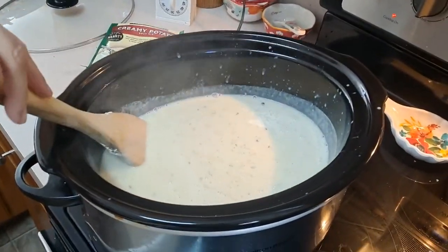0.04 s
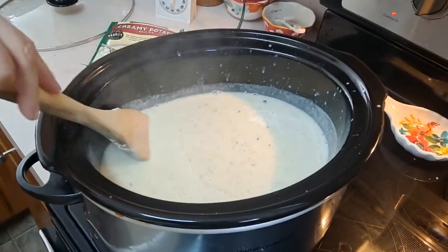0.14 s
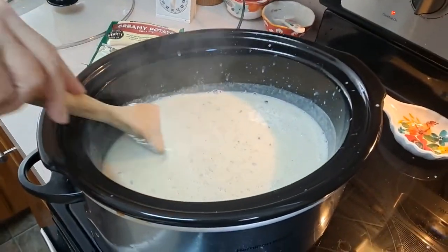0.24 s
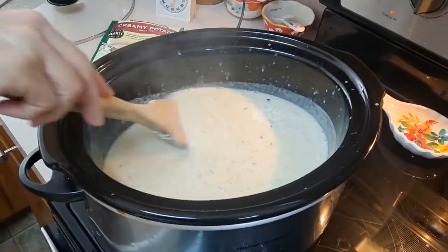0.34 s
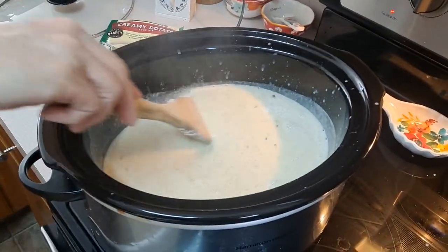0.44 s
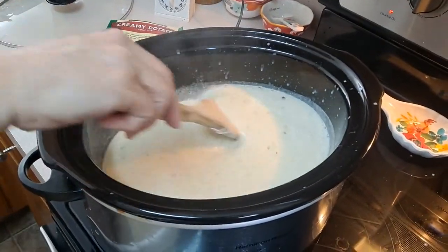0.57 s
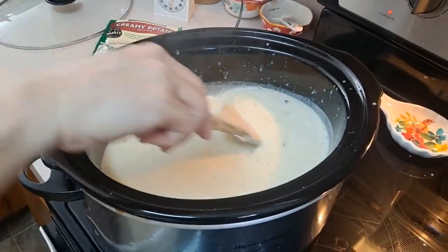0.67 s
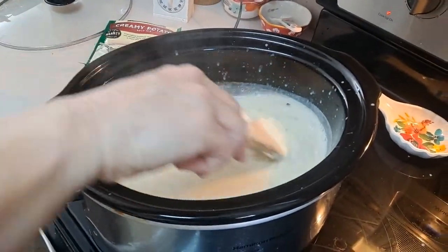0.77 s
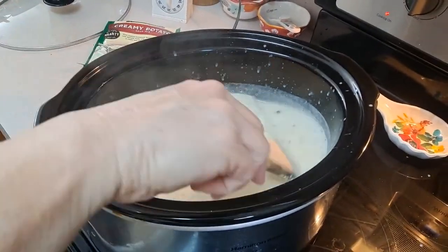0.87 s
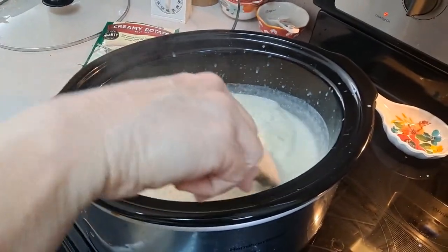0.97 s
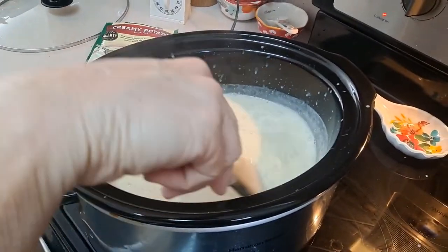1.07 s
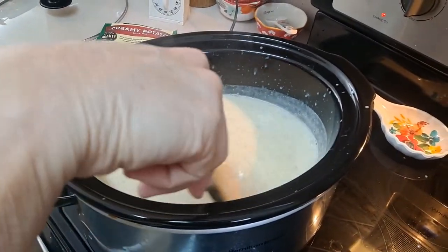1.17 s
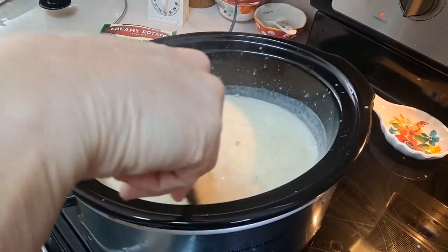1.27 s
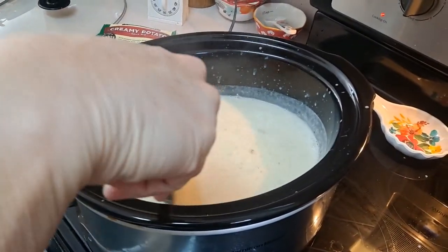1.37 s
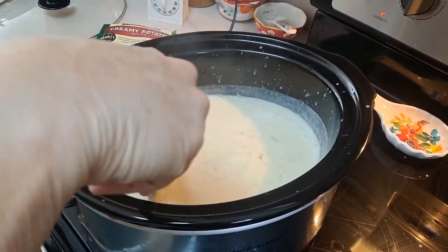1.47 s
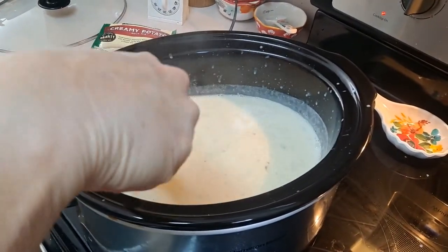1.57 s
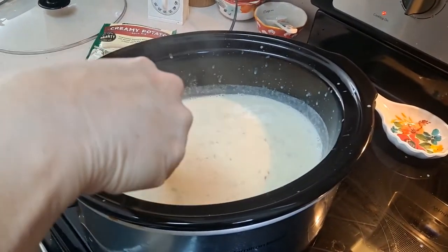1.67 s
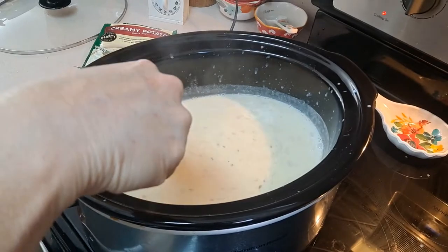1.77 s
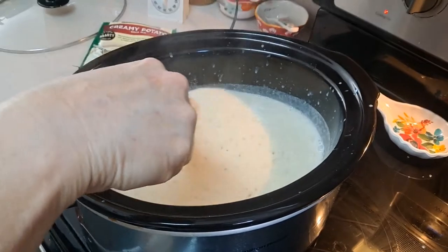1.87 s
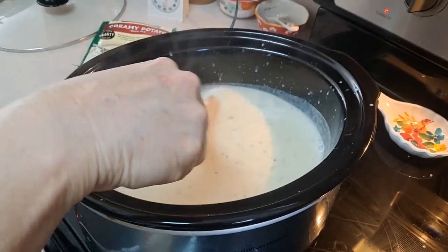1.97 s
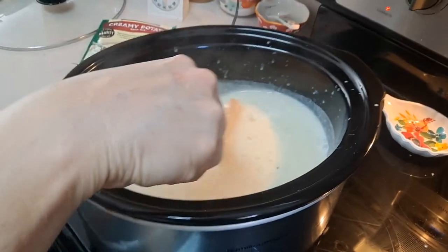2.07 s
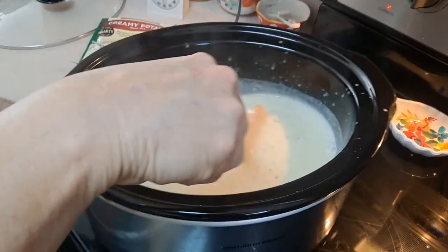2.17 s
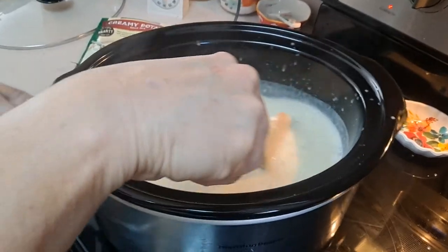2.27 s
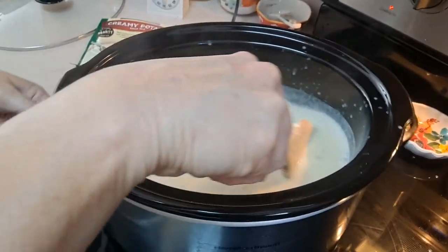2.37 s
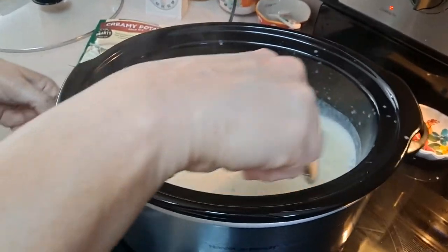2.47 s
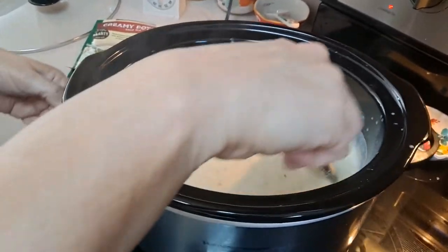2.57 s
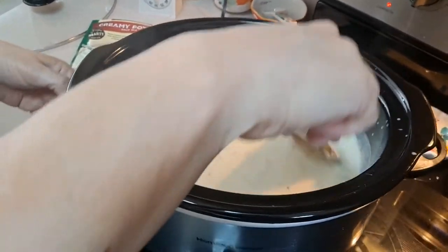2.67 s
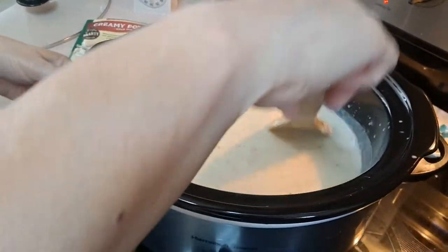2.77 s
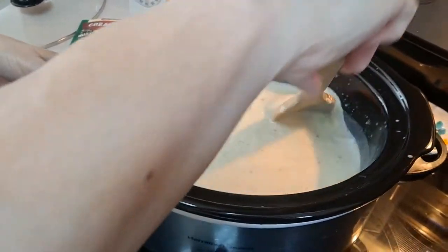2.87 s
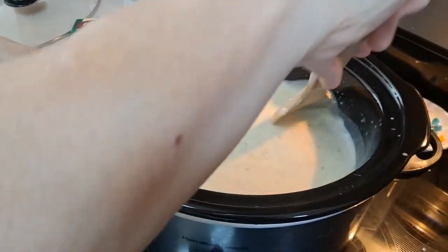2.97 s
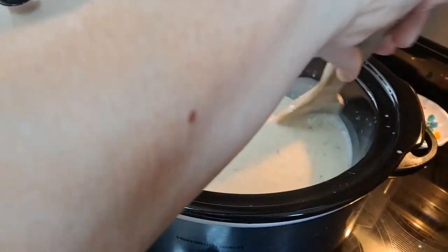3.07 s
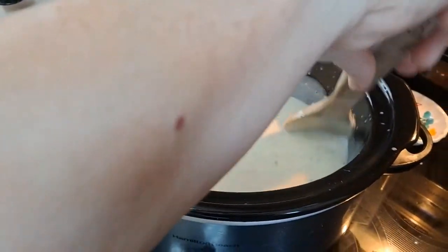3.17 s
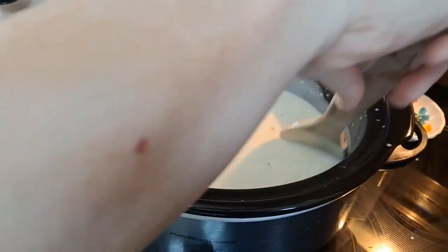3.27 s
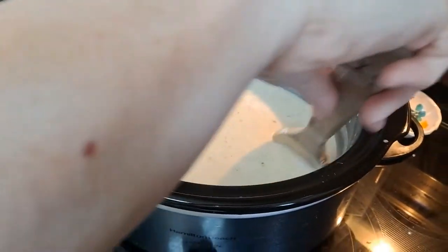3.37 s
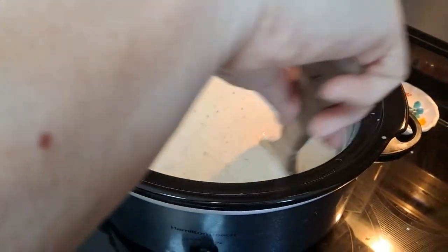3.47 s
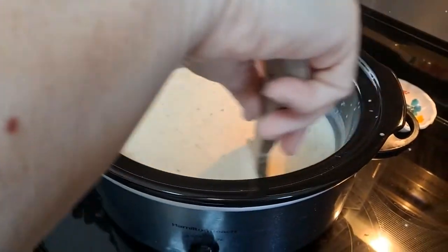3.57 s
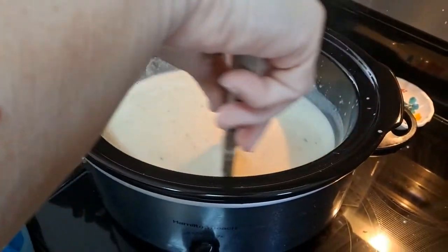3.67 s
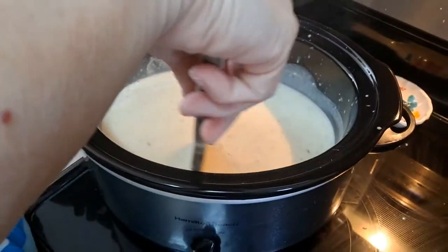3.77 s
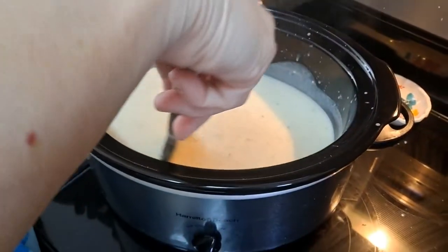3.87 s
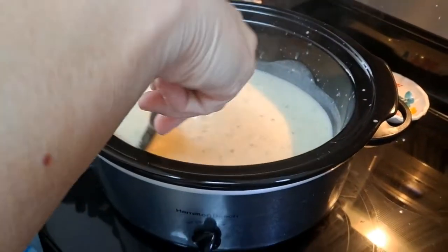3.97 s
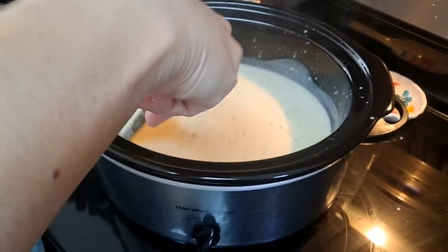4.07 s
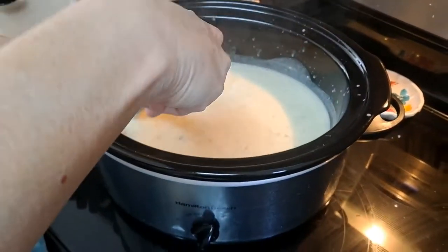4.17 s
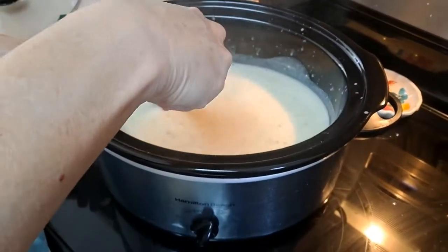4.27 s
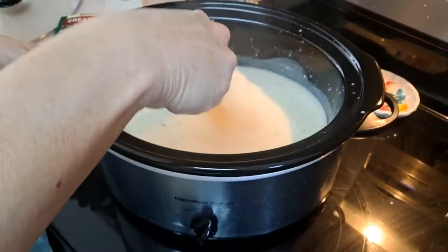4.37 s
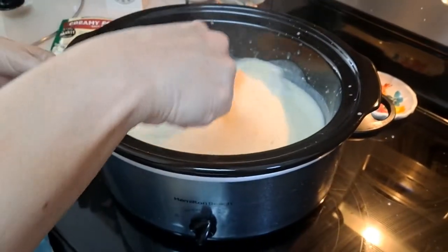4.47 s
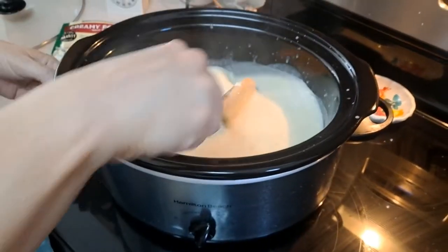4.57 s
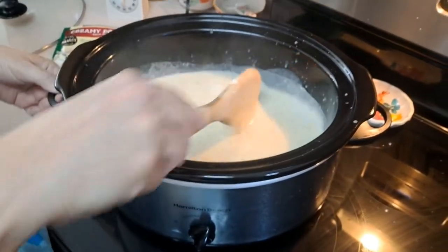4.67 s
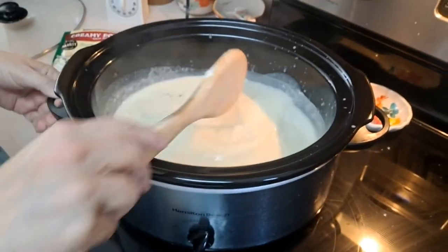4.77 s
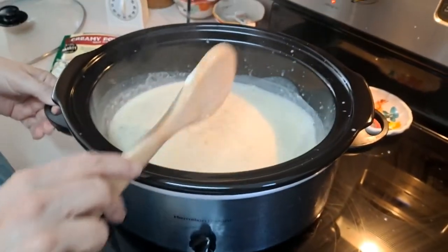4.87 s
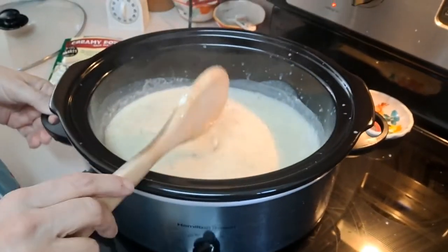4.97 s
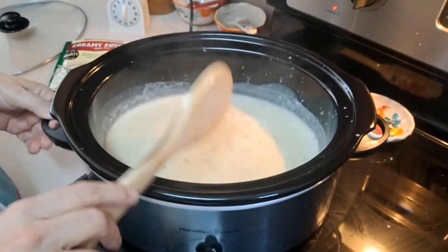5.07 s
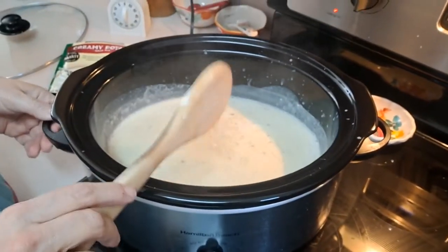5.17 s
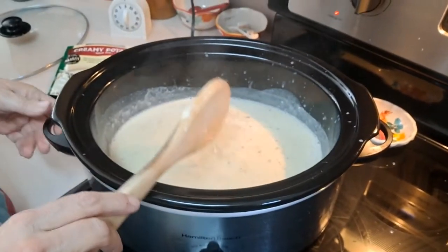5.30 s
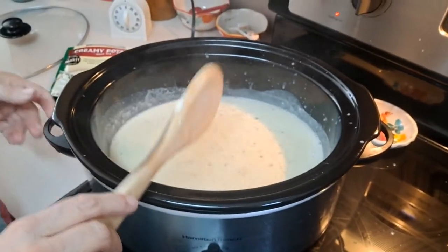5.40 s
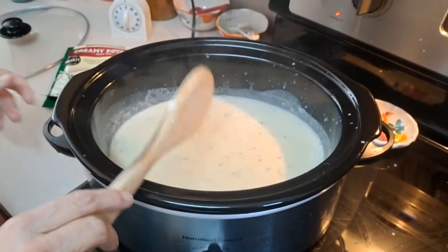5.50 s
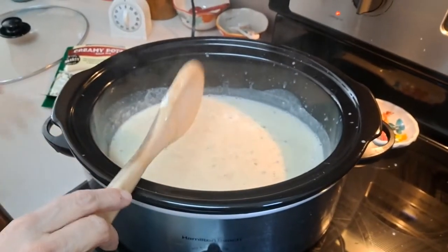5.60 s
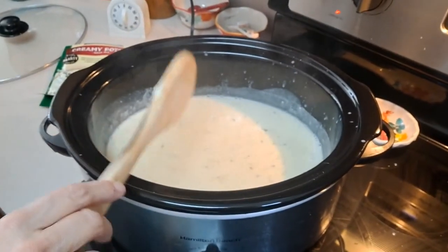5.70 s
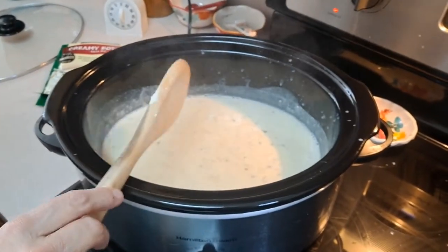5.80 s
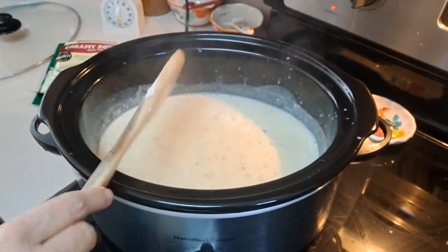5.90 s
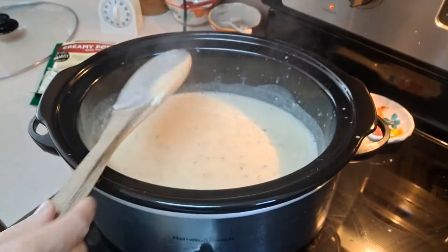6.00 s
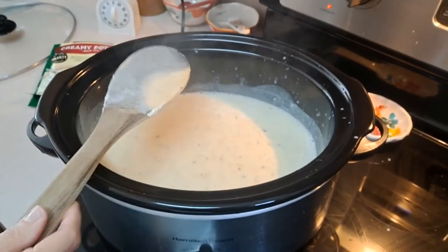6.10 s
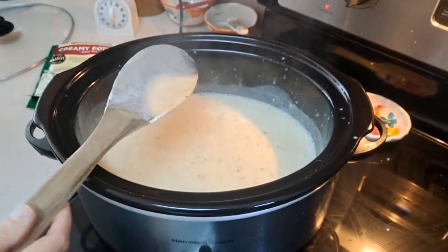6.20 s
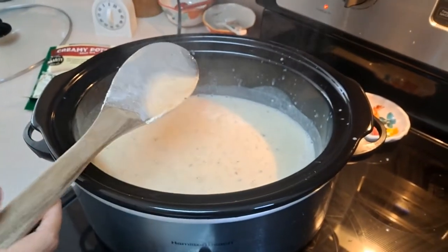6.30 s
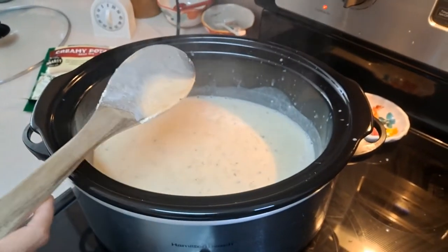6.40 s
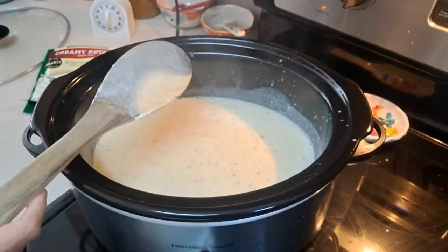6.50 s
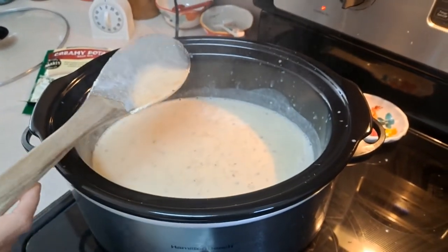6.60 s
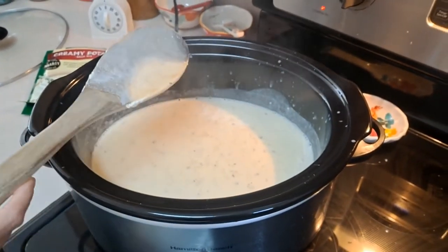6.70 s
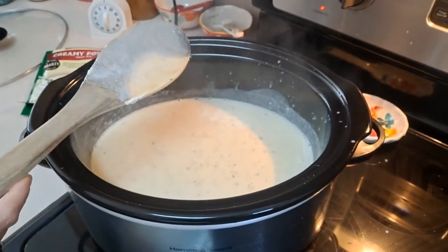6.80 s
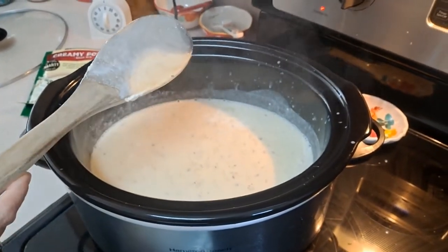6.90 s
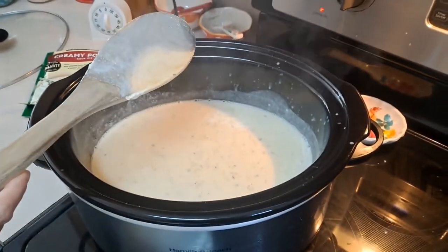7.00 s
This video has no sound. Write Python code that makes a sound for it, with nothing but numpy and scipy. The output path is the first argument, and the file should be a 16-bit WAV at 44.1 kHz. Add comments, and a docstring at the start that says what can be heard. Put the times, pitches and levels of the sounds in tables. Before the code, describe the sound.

In a small kitchen, a wooden spoon drags and knocks through a filled ceramic crock, with low thumps and short damped rings. The heavy cooker then rubs quietly across a gritty counter, with light clatter and a soft soup swish. Finally six crisp wooden raps strike the rim at a steady pace. A faint motor hum lies beneath; the microphone is close, in stereo.

```python
"""A wooden spoon stirs thick soup in the ceramic crock of a slow cooker: trains of stick-slip blows ring crock and blade.
Six raps of the handle on the rim follow, each a crack with a rattle and the damped modes of the spoon.
Between them a push slides the cooker over the counter as rubbing noise, grit and housing resonances; light bumps
clatter and clink, and soup swishes as soft bands of noise. Motor lines hum over low air noise.
A small kitchen answers the strokes, raps, bumps and grit with quick reflections and a fading tail."""
import sys
import numpy as np
from scipy import signal
from scipy.fft import rfft, irfft
from scipy.io import wavfile
from scipy.ndimage import uniform_filter1d, map_coordinates

SR = 44100
rng = np.random.default_rng(int(sys.argv[2]) if len(sys.argv) > 2 else 0)


def waveform_to_disk(signal):
    """Save audio, clipped to [-1, 1], as 16-bit WAV at the path in sys.argv[1]."""
    frames = np.transpose(np.atleast_2d(signal))
    scaled = np.clip(frames, -1, 1) * 32767
    samples = np.round(scaled).astype(np.int16)
    wavfile.write(sys.argv[1], SR, samples)


N = 310905
TIME = np.arange(N) / SR
SHORT = TIME[:SR // 2]  # time axis of one short event [s]

# Motor lines: (frequency [Hz], level [dB])
MOTOR_LINES = [(59.2, -62), (80.7, -65), (118.4, -55), (209.9, -67), (296.1, -55.5), (355.3, -74),
               (414.5, -70), (640.6, -85)]
# Colour of the kitchen air: (frequency [Hz], relative level [dB])
AIR_COLOUR = [(12, -46.5), (22, -6), (32, -1.5), (113, -6.5), (137, -6.5), (162, -8), (209, 2),
              (247, -10.5), (300, -10.5), (345, -16.5), (419, -14), (586, -24.5), (1350, -37),
              (5950, -47.5), (9300, -41.5), (15800, -53)]
# Stereo balance of the air: (frequency [Hz], left minus right [dB])
AIR_BALANCE = [(60, -13.5), (110, -8), (200, -2), (700, -4), (1500, 0)]
AIR_DB = -51

# Fade of the kitchen: (frequency [Hz], t60 [s])
ROOM_T60 = [(80, 0.33), (300, 0.43), (1000, 0.36), (2000, 0.33), (6000, 0.3), (14000, 0.2)]
# Likeness of the two channels in diffuse sound: (frequency [Hz], correlation [0-1])
LIKENESS = [(100, 1), (300, 0.76), (700, 0.3), (1300, 0.0096)]
RIGHT_LAG_MS = 0.14

# Hand pushing the cooker over the counter: (time [s], attack [s], length [s], level [dB])
PUSHES = [(1.982, 0.12, 0.26, -45), (2.207, 0.24, 0.5, -45)]
# Colour of the feet rubbing the counter: (frequency [Hz], relative level [dB])
SLIDE_COLOUR = [(200, 13), (450, -2), (650, -6.5), (820, 2), (1050, -11), (1200, 0.5), (1350, -8),
                (1550, -3), (2400, -4), (3200, -8.5), (5000, -15), (9000, -19), (10500, -31), (15000, -26)]
# Resonances of the cooker housing: (frequency [Hz], width [Hz], level against the rubbing [dB])
HOUSING = [(810, 70, -27), (1170, 38, -22.5), (1370, 83, -22), (1556, 100, -15), (1920, 50, -24),
           (2130, 66, -19), (2410, 78, -22), (2670, 60, -20.5), (3200, 150, -23)]
PUSH_RELEASE_S = 0.099  # coasting to rest
RUB_DB, FRICTION_DB, CATCH_DB = -1, 0.5, 0.5  # plain rubbing; its fast unevenness; slower catching of the feet
HOUSING_DRIFT, HOUSING_FLICKER_DB = 0.016, 6.5  # the load shifts their pitch [share] and strength
GRAINS_PER_S, GRAIN_SPREAD_DB, GRAIN_DB = 260, 7.5, -14  # specks of grit catching under the feet

# Soup parting around the spoon: (time of peak [s], level [dB], half length [s], centre [Hz], width [octaves])
SWISHES = [(3.277, -70.5, 0.17, 1160, 0.25), (3.756, -74, .25, 630, 0.31), (4.944, -63, 0.091, 1620, 0.62)]

# Small bumps around the cooker:
# (time [s], energy [dB], centre [Hz], width [octaves], t60 [s], low thud [dB], ring [dB])
BUMPS = [(2.8983, -15, 1340, 0.39, 0.005, -17, 13), (3.008, -17, 1620, 0.69, 0.047, 5.5, -11),
         (3.026, -24.5, 1100, 1, 0.092, 10, -29), (4.195, -17.5, 506, 0.27, 0.06, -9, -33)]
# Modes of what is bumped, perhaps a dish: (frequency [Hz], relative level [dB], t60 [s])
DISH = [(610, -2.5, 0.07), (759, -11, 0.1), (1010, 1, 0.02), (1170, -3.5, 0.085), (1270, -2, .014),
        (1790, -13, 0.013), (1990, -7, .012), (2550, -12, .008), (2900, -12, .012)]

# Spoon handle rapped on the rim: (time [s], energy [dB], crack [dB], place along the handle [-1 to 1])
RAPS = [(4.9508, 9.5, -7, -0.5), (5.1266, 10, -7.5, -0.61), (5.2892, 10, -4, -0.53), (5.4583, 9, -6, 0.065),
        (5.6451, 8.5, -6, -0.16), (5.8287, 9, -9.5, 0.68)]
# Modes of the spoon against the rim:
# (frequency [Hz], relative level [dB], t60 [s], gain per unit of place [dB])
SPOON = [(221.4, -20, 0.075, 10.5), (272, -7.5, 0.038, -3.5), (404, -7, 0.047, -2.5),
         (543, -7.5, 0.026, -1), (636, -10.5, 0.071, -0.5), (696, -15, 0.12, 2), (1268, -6, 0.026, 4),
         (1484, -13, 0.042, -0.5), (1555, -8.5, 0.07, -4), (1755, -1, 0.05, 0), (1853, -7.5, 0.06, -1),
         (1993, -1.5, 0.012, -3), (2290, -13, 0.029, -6.5), (3073, -10.5, 0.013, -1.5),
         (3966, -15, 0.029, -4.5), (5860, -15.5, .012, -7)]
# Colour of the crack at the contact: (frequency [Hz], relative level [dB])
CRACK = [(15, -29.5), (50, -21), (130, 2), (600, 9), (1000, 2), (1800, -3.5), (2600, 2.5), (3200, -4),
         (4000, -4.5), (4900, -5), (5800, -4), (6900, -16), (7700, -11), (9500, -15.5), (11000, -23.5),
         (15000, -32)]
REBOUND_SHARE, RATTLE_DB = 0.5, -12.5  # chatter against the blow; rattle against the crack

# Spoon dragging on the crock under the soup:
# (time [s], level [dB], bite [s], length [s], thump [dB], thump tilt [dB per octave],
#  crock ring [dB], blade ring [dB], grit [dB])
STROKES = [(0.000, -18, 0.00037, 0.024, 7, -2, -14.5, -26, -16),
           (0.115, -25, 0.004, 0.046, 8, -5, -30, -17.5, -11),
           (0.322, -56.5, 0.017, 0.13, 8, -5, -5.5, -29, -21),
           (0.527, -26, 0.012, 0.032, 3, 5, 7.5, -14.5, -10),
           (0.577, -29, 0.0018, 0.022, -6, -8, 3.5, -21, -21.5),
           (0.934, -31.5, 0.0077, 0.059, 4.5, 3.5, -14, -13, -14.5),
           (1.323, -46.5, 0.0067, 0.051, 6, 5.5, -13, -10.5, -13)]
# Colour of the soup-damped body: (frequency [Hz], relative level [dB])
BODY = [(30, -22), (70, -25), (120, 6.5), (175, 5), (250, -0.5), (400, -3.5), (580, 1.5), (800, -12.5),
        (1000, -14.5), (2000, -19), (3000, -31), (8000, -44.5)]
# Colour of wood grain on the glaze: (frequency [Hz], relative level [dB])
GRIT = [(500, -27), (1500, 2), (2600, 3.5), (3600, 4), (5000, 0.5), (7000, -6.5), (9500, -3.5),
        (11000, -11), (13000, -6.5), (16000, -27)]
# Modes of the filled crock: (frequency [Hz], relative level [dB], t60 [s])
CROCK = [(200, -2, .15), (232, 1, .2), (256, 2, .25), (312, -3, .12), (369, 1, .28), (405, -2, .26),
         (490, -5, .1), (576, -3, .18), (630, 3.5, .24), (689, -1.5, .16), (757, -2, .14), (984, -9, .16),
         (1184, -12, .38), (1228, -10, .14), (1384, -19, .12), (1659, -15, .18), (1870, -15, .1),
         (1960, -6, .06), (2021, -1, .11), (2110, -10, .07), (2335, -16, .12), (2740, -15, .1),
         (3092, -6.5, .08), (3145, -10.5, .04), (3210, -11, .1), (3980, -15, .06), (4270, -13, .08),
         (4550, -17, .04), (4990, -19, .04), (5180, -17, .045), (5910, -20, .035), (6700, -20, .04),
         (7000, -21, .04), (7430, -23, .07)]
# Modes of the blade pressed against the wall: (frequency [Hz], relative level [dB], t60 [s])
BLADE = [(947, -7, 0.041), (1248, 4.5, 0.12), (1373, -8.5, 0.08), (1457, 0, 0.067), (1920, -2, 0.044),
         (2096, -23.5, 0.12), (3730, -21, 0.027), (4100, -21, 0.057), (4710, -10, 0.079)]
# Modes of the cooker rocking on its feet: (frequency [Hz], relative level [dB], t60 [s])
FEET = [(50, -10.5, 0.22), (60, 2, 0.4), (81, -0.5, .22), (102.5, -1, .22), (118, -10, 0.17),
        (168, -6, .16), (188, -10, 0.21), (280, -10, 0.089)]
CHATTER_DB, CHATTER_PER_S = 3.5, 170  # the blade grips and lets go
PRESS_DRIFT = 0.0076  # changing pressure bends the crock's pitch [share]

LEFT_BASS_CUT_HZ, TOP_HZ = 86, 15850


def undb(db):
    """Decibels to gain."""
    return 10 ** (np.asarray(db) / 20)


def along(points, hz):
    """Read (frequency, value) points on a log-frequency axis."""
    f, value = np.transpose(points)
    return np.interp(np.log(np.maximum(hz, 1)), np.log(f), value)


def bins(size):
    """Frequencies of a real spectrum [Hz]."""
    return np.arange(size // 2 + 1) * SR / size


def unit(x):
    """Scale to energy 1."""
    return x / np.sqrt(np.sum(x ** 2))


def pan(db):
    """Left and right gains for a left-minus-right level."""
    return undb(np.array([[db], [-db]]) / 2)


def add(track, s, sound):
    """Mix a sound in at time s."""
    start = max(int(s * SR), 0)
    track[..., start:start + sound.shape[-1]] += sound[..., :N - start]


def wander(per_s, size=4096):
    """Random values, so many a second, joined by straight lines."""
    return np.interp(TIME * per_s, np.arange(size), rng.standard_normal(size))


def bend(x, share, per_s):
    """Let the pitch of a ringing sound waver."""
    clock = np.cumsum(1 + share * wander(per_s)[:len(x)])
    return map_coordinates(x, [clock - 1], order=3)


def band(centre_hz, octaves):
    """Colour points of one broad resonance."""
    hz = np.geomspace(30, 16000, num=60)
    offset = np.log2(hz / centre_hz) / octaves
    return np.transpose([hz, -18 * np.log10(1 + (offset / 1.3) ** 4)])


def click(points, size=4096):
    """Minimum-phase impulse response of a given colour: its energy comes as early as it can."""
    cepstrum = irfft(np.log(undb(along(points, bins(size)))))
    # fold the cepstrum forward in time to make the response causal
    cepstrum[1:size // 2] *= 2
    cepstrum[size // 2 + 1:] = 0
    return irfft(np.exp(rfft(cepstrum)))


def drive(force, response):
    """A force played through a response, energy 1."""
    return unit(signal.fftconvolve(force, response)[:len(SHORT)])


def even(x, width_hz):
    """Spread a sound's energy evenly over frequency, keeping its timing and fine grain."""
    smoothing = max(int(width_hz * len(x) / SR), 1)
    power = uniform_filter1d(np.abs(rfft(x)) ** 2, smoothing)
    inverse = np.transpose([bins(len(x)), -10 * np.log10(power + 1e-12)])
    return unit(signal.fftconvolve(x, click(inverse))[:len(x)])


def burst(t60):
    """White noise that dies away."""
    noise = rng.standard_normal(len(SHORT))
    return even(noise * undb(-60 * SHORT / t60), width_hz=350)


def ring(force, modes, detune, scatter_db):
    """Damped modes shaken by a force; the place of contact changes their pitch and strength a little."""
    chance = rng.standard_normal((len(modes), 2))
    out = 0
    for (hz, db, t60), (pitch_chance, level_chance) in zip(modes, chance):
        tone = np.sin(2 * np.pi * hz * (1 + detune * pitch_chance) * SHORT)
        mode = drive(force, undb(-60 * SHORT / t60) * tone)
        # neighbouring modes swing in opposite senses
        out = undb(db + scatter_db * level_chance) * mode - out
    return unit(out)


def diffuse(size):
    """Spectra of noise from all around: alike in the bass, unrelated in the treble."""
    alike = np.clip(along(LIKENESS, bins(size)), 0, 1)
    mid, side = rfft(rng.standard_normal((2, size))) * np.sqrt([1 + alike, 1 - alike])
    return np.array([mid + side, mid - side]) / np.sqrt(2)


def wash(colour, balance):
    """Steady stereo noise of a given colour, rms 1."""
    tilt = np.array([[0.5], [-0.5]]) * along(balance, bins(N))
    gain = undb(along(colour, bins(N)) + tilt)
    return unit(irfft(diffuse(N) * gain, N)) * np.sqrt(2 * N)


def kitchen(dry, near_db, wet_db):
    """Direct sound, earlier on the left; quick reflections off pot and stove; a tail fading band by band."""
    size = len(SHORT)
    noise, tail = diffuse(size), 0
    for own, (_, t60) in zip(np.eye(len(ROOM_T60)), ROOM_T60):
        # each band crossfades into its neighbours
        share = along([(hz, part) for (hz, _), part in zip(ROOM_T60, own)], bins(size))
        tail = tail + irfft(noise * share, size) * undb(-60 * SHORT / t60)
    near = irfft(diffuse(size), size) * np.exp(-SHORT / 0.0035)
    tail = tail * (1 - np.exp(-SHORT / 0.00086))  # soft onset
    response = np.sqrt(2) * (undb(near_db) * unit(near) + undb(wet_db) * unit(tail))
    # direct sound
    response[0, 0] += 1
    response[1, int(RIGHT_LAG_MS * SR / 1000)] += 1
    return np.array([signal.fftconvolve(x, even(h, width_hz=123))[:len(x)] for x, h in zip(dry, response)])


def hum():
    """Motor lines waver slightly in phase and level over the low rumble of the air; the bass leans right."""
    out = undb(AIR_DB) * wash(AIR_COLOUR, AIR_BALANCE)
    knots = np.linspace(0, TIME[-1], num=30)
    for hz, db in MOTOR_LINES:
        drift, swell = (np.interp(TIME, knots, rng.standard_normal(len(knots))) for _ in range(2))
        phase = 2 * np.pi * (hz * TIME + rng.random()) + 0.23 * drift
        line = np.sqrt(2) * undb(db + 2.2 * swell) * np.sin(phase)
        out = out + line * pan(along(AIR_BALANCE, hz))
    return out


def push(s, attack, hold):
    """Speed of one push, 0-1: it builds up, holds and dies away."""
    age = np.maximum(TIME - s, 0)
    build = 1 - np.exp(-(age / attack) ** 2)
    return build * np.exp(-np.maximum(age - hold, 0) / PUSH_RELEASE_S)


def gritty_counter():
    """Specks catch under the feet at random moments, each a small click answered by the kitchen."""
    specks = (rng.random(N) < GRAINS_PER_S / SR) * undb(GRAIN_SPREAD_DB * rng.standard_normal(N))
    colour = click(band(centre_hz=2250, octaves=0.86))
    grit = unit(signal.fftconvolve(specks, colour)[:N]) * np.sqrt(N)  # rms 1
    return kitchen(undb(GRAIN_DB) * grit * pan(-2.5), near_db=-1, wet_db=-1)


def housing():
    """The housing sings in narrow resonances: slow complex noise sets each width around a drifting pitch."""
    out = np.zeros((2, N))
    clock = np.cumsum(1 + HOUSING_DRIFT * wander(per_s=4.6)) / SR
    for hz, width_hz, db in HOUSING:
        shaken = np.array([wander(width_hz) + 1j * wander(width_hz) for _ in range(2)])
        strength = undb(db + HOUSING_FLICKER_DB * wander(per_s=9))
        out += strength * np.real(shaken * np.exp(2j * np.pi * hz * clock))
    return out


def sliding():
    """The feet rub unevenly over the gritty counter as hard as the hand pushes, and the housing sings along."""
    speed = sum(undb(db) * push(s, attack, hold) for s, attack, hold, db in PUSHES)
    rub = undb(RUB_DB) * wash(SLIDE_COLOUR, [(200, -5.0), (2000, -3.0)])
    rub = rub + gritty_counter() + housing()
    friction = undb(FRICTION_DB * wander(per_s=85) + CATCH_DB * wander(per_s=19))
    return speed * friction * rub


def swishing():
    """Thick soup folds softly behind the blade: bands of noise that swell and sink."""
    out = np.zeros((2, N))
    for s, db, half_length, centre_hz, octaves in SWISHES:
        swell = np.exp(-((TIME - s) / half_length) ** 2)
        out += undb(db) * swell * wash(band(centre_hz, octaves), AIR_BALANCE)
    return out


def bumps():
    """Light knocks: a brief band of clatter over a low thud, and the short ring of the thing that is touched."""
    out = np.zeros((2, N))
    for s, db, centre_hz, octaves, t60, thud_db, ring_db in BUMPS:
        force = burst(t60)
        clatter = drive(force, click(band(centre_hz, octaves)))
        clink = undb(ring_db) * ring(force, DISH, detune=0.0031, scatter_db=7)
        thud = undb(thud_db) * drive(burst(t60=0.24), click(band(centre_hz=137, octaves=1)))
        add(out, s, undb(db) * (clatter + clink + thud) * pan(-4.0))
    return kitchen(out, near_db=-10.5, wet_db=-9.0)


def rapping():
    """The handle cracks on the rim, its ring coloured by the place that hits; crock and cooker answer."""
    out = np.zeros((2, N))
    for s, db, crack_db, place in RAPS:
        blow = np.zeros(len(SHORT))
        add(blow, 0.0012, np.ones(1))
        chatter = np.roll(burst(t60=0.012), np.argmax(blow))  # starts with the blow
        modes = [(hz, part + place * gain_db, t60) for hz, part, t60, gain_db in SPOON]
        contact = even(blow + REBOUND_SHARE * chatter, width_hz=97)
        wood = ring(contact, modes, detune=0.002, scatter_db=1)
        crack = drive(burst(t60=0.0084) * (1 - np.exp(-SHORT / 0.00033)), click(CRACK))
        rattle = undb(RATTLE_DB) * drive(burst(t60=0.055), click(CRACK))
        crock = ring(blow, CROCK, detune=0.0012, scatter_db=3.0)
        crock = undb(-21) * drive(crock, click(band(centre_hz=500, octaves=1.3)))
        thump = undb(-7.5) * ring(blow, FEET, detune=0.046, scatter_db=3.5)
        sound = undb(db) * (wood + undb(crack_db) * (crack + rattle) + crock + thump)
        add(out, s, kitchen(sound * pan(0), near_db=3.5, wet_db=-7.0))
    return out


def judder(length, slips_per_s, spread_db, rise_s):
    """Stick and slip: uneven little blows that swell quickly and die as the spoon comes free."""
    chance, size = rng.random(len(SHORT)), rng.standard_normal(len(SHORT))
    pressure = (1 - np.exp(-SHORT / rise_s)) * np.exp(-(SHORT / length) ** 2)
    grip = undb(CHATTER_DB * wander(CHATTER_PER_S)[:len(SHORT)])
    blows = (chance < slips_per_s / SR) * np.sign(size) * undb(spread_db * np.abs(size))
    return even(blows * pressure * grip, width_hz=42)


def stirring():
    """Each drag shakes the damped crock, wakes its modes and those of the blade, and rocks the cooker."""
    out = np.zeros((2, N))
    for s, db, bite_s, length, thump_db, tilt_db, ring_db, blade_db, grit_db in STROKES:
        slips = judder(length, slips_per_s=760, spread_db=3.5, rise_s=bite_s)
        grain = judder(length, slips_per_s=5800, spread_db=4.5, rise_s=bite_s / 2)
        body = drive(slips, click(BODY))
        grit = undb(grit_db) * drive(grain, click(GRIT))
        crock = ring(grain, CROCK, detune=0.00036, scatter_db=1)
        crock = undb(ring_db) * bend(crock, PRESS_DRIFT, per_s=63)
        blade = undb(blade_db) * ring(slips, BLADE, detune=0.0034, scatter_db=2.0)
        rocking = [(hz, part + tilt_db * np.log2(hz), t60) for hz, part, t60 in FEET]
        thump = undb(thump_db) * ring(slips, rocking, detune=0.014, scatter_db=4)
        # a longer drag carries more energy
        sound = undb(db) * np.sqrt(length * SR) * (body + grit + crock + blade + thump)
        add(out, s, kitchen(sound * pan(-0.44), near_db=0.0, wet_db=-2.0))
    return out


def scene():
    """Everything heard from above the pot."""
    return hum() + sliding() + swishing() + bumps() + rapping() + stirring()


def record(dry):
    """The left microphone is thinner in the bass; the recorder cuts the top steeply."""
    bass_cut = signal.butter(1, LEFT_BASS_CUT_HZ, "highpass", fs=SR, output="sos")
    top_cut = signal.ellip(10, 0.2, 80, TOP_HZ, fs=SR, output="sos")
    left = signal.sosfilt(bass_cut, dry[0])
    return signal.sosfilt(top_cut, np.array([left, dry[1]]))


dry = scene()
out = record(dry)
waveform_to_disk(out)
```